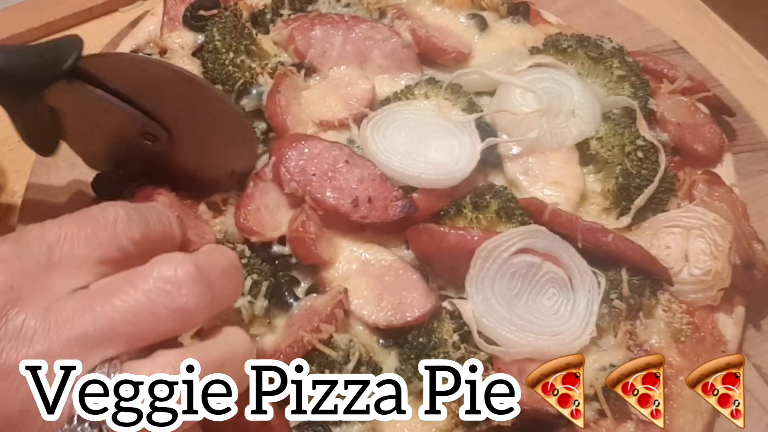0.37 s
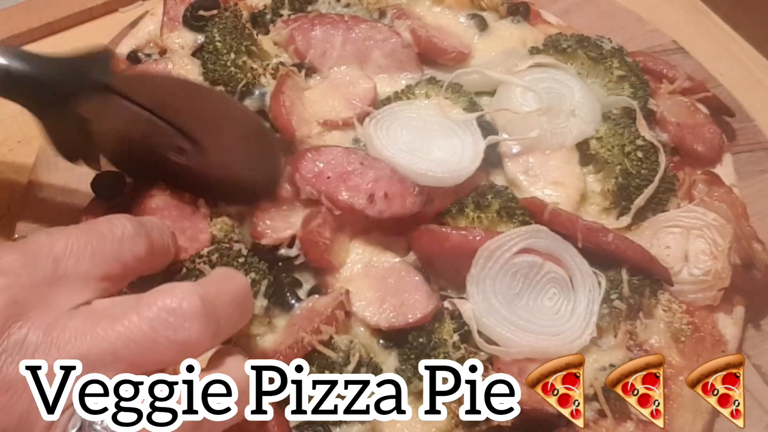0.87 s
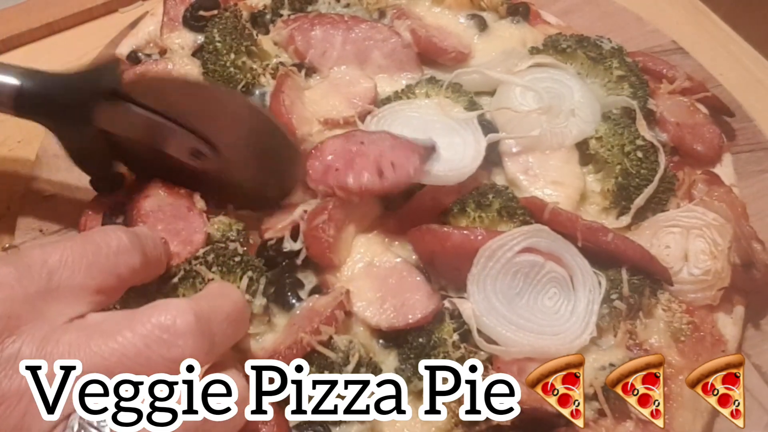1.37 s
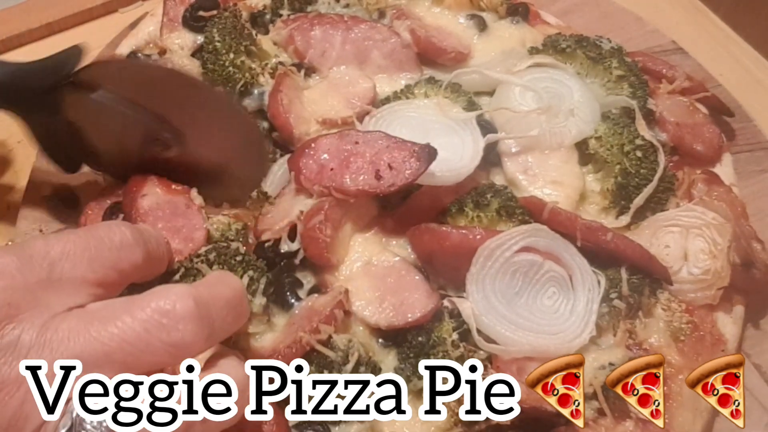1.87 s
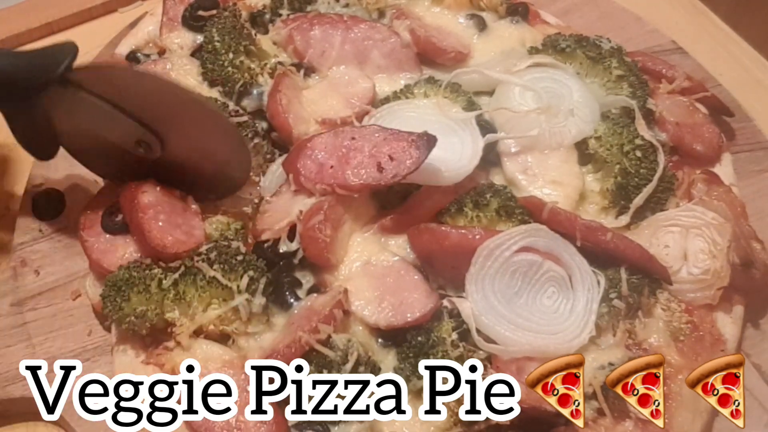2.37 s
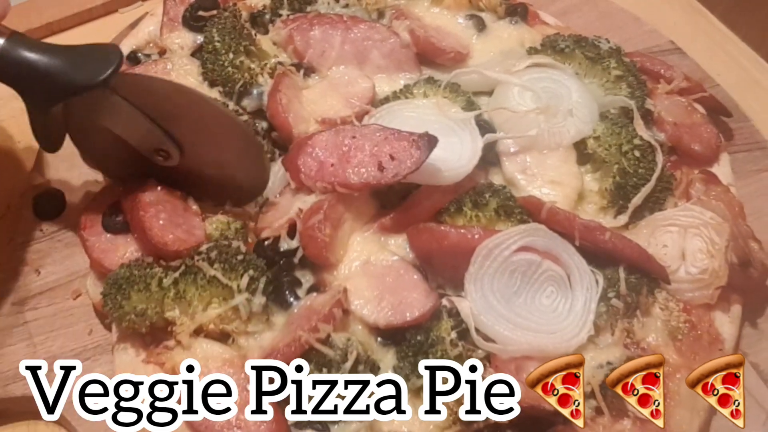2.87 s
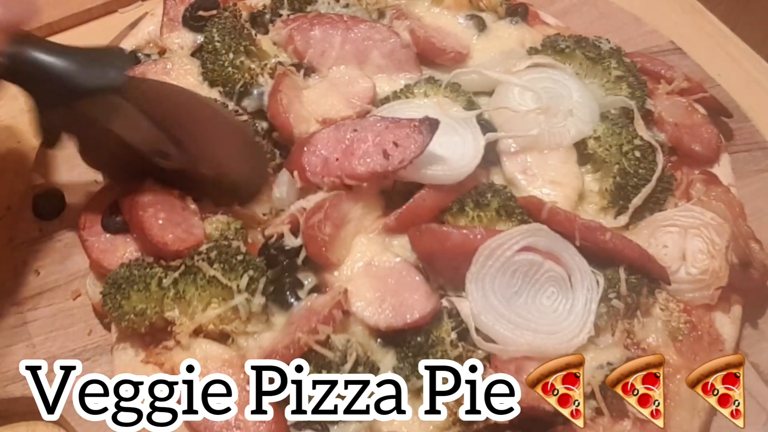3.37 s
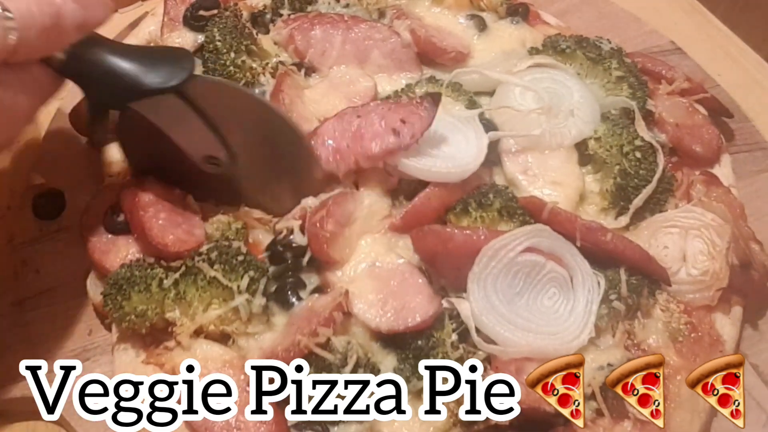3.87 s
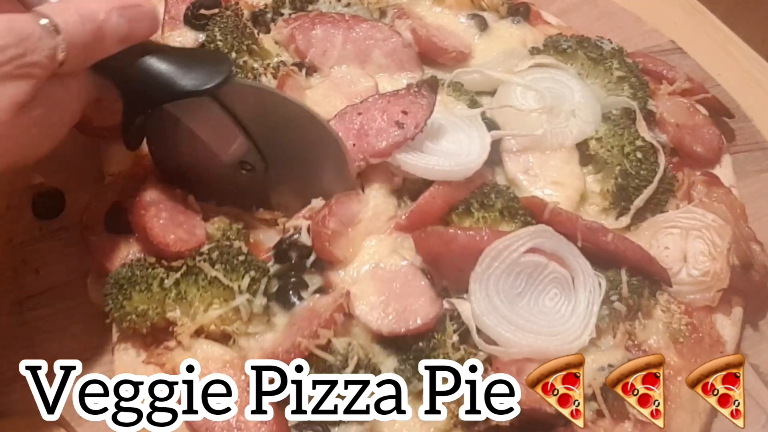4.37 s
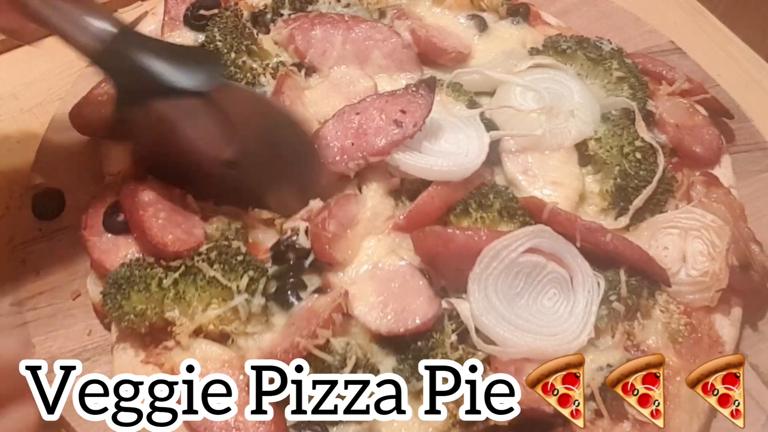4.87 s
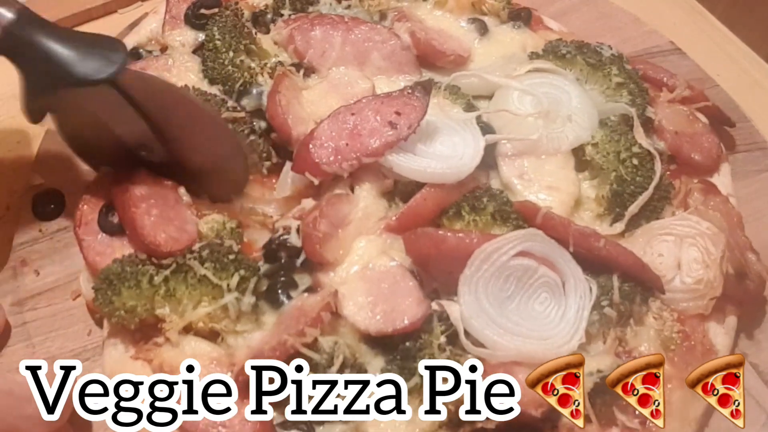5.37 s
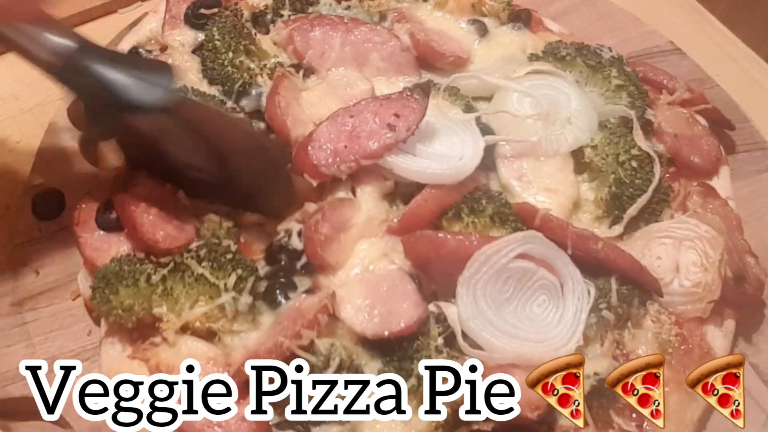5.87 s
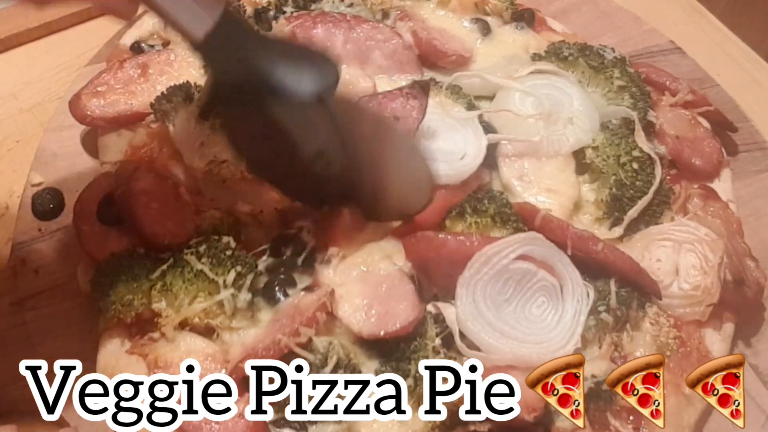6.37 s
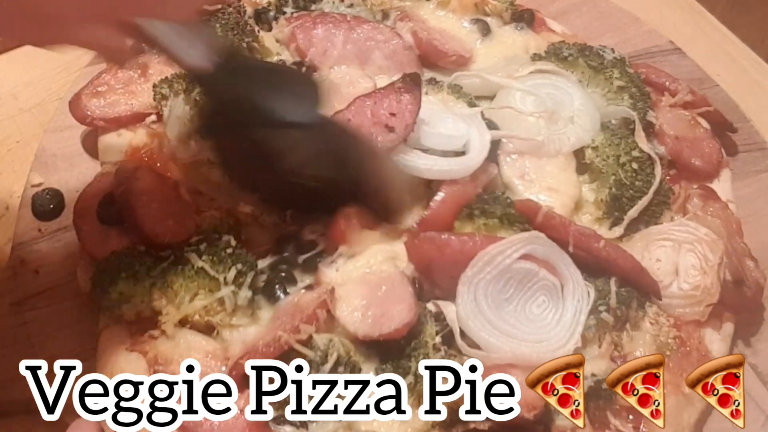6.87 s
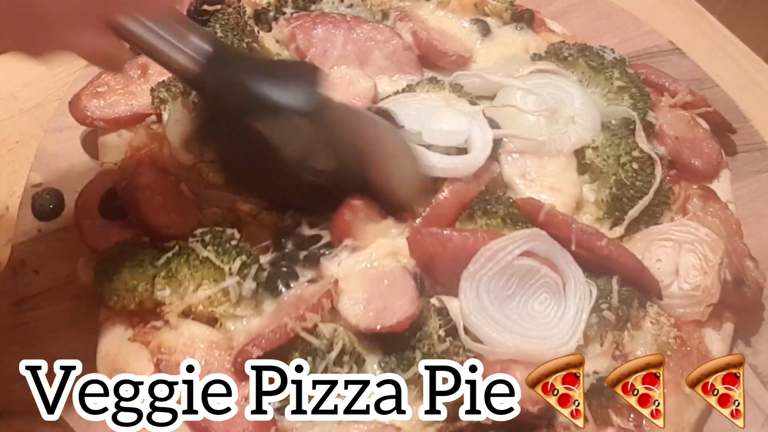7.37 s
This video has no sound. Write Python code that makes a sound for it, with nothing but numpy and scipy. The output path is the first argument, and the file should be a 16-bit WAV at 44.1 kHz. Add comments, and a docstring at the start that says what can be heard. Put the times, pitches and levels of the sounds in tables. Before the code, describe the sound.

In a small hard kitchen, a steel wheel cutter starts with faint crackles and knocks on pizza crust. From two seconds the strokes press harder, crunching crisp crust and grinding a wooden board while a low drone swells. After the hardest run, the lifted wheel clicks and rings briefly around six seconds, then lighter cuts follow. Close stereo microphones.

```python
"""A kitchen, two close microphones: a faint narrow hiss, then a steel wheel cutter rocks lightly in a pizza crust.
From two seconds the strokes bear down, grinding the wooden board in grains and cracking the crisp crust; the hiss
returns once as an appliance drone swells. Knocks and snaps are millisecond bursts that ring the board.
After a last hard run the lifted wheel clicks on its axle from six seconds and rings in steel modes; lighter strokes
follow. The small hard room answers every stroke and blow for a third of a second, over steady air."""
import sys
import numpy as np
from scipy import signal
from scipy.fft import rfft, irfft, next_fast_len
from scipy.io import wavfile
from scipy.ndimage import uniform_filter1d

SR = 44100
rng = np.random.default_rng(int(sys.argv[2]) if len(sys.argv) > 2 else 0)


def transcribe(signal):
    """Save signal, clipped to [-1, 1], as a 16-bit WAV file at the path in sys.argv[1]."""
    frames = np.atleast_2d(signal).T
    limited = np.clip(frames, -1, 1)
    pcm = np.round(limited * 32767).astype(np.int16)
    wavfile.write(sys.argv[1], SR, pcm)


def voltage_ratio(decibels):
    """Convert decibels (scalar or array-like) to amplitude ratios, 20 dB per decade."""
    exponent = np.asarray(decibels, float) / 20
    return 10 ** exponent


N = 330309

# pushes of the wheel: full push t/s, hold t/s, pressure on the board level/dB, crust breaking level/dB,
# crispness of the break level/dB above the breaking (all before the trims in strokes)
STROKE_PUSHES = [(0.0, 0.02, -57, -95, -12), (0.34, 0.07, -72, -90, 14.5), (0.457, 9.4, -78, -79.5, 6),
                 (0.75, 0.036, -52, -60, 5), (0.857, 0.017, -55.5, -65.5, 6), (0.904, 0.029, -70, -63, -4),
                 (1.157, 0.12, -59, -58.5, 4.5), (1.36, 0.32, -63, -71, 5.5), (1.608, 0.026, -57, -57, -4),
                 (1.764, 0.071, -55, -62, 3), (1.919, 0.043, -45, -60.5, 3),
                 (2.082, 0.034, -37.5, -51.5, 2), (2.252, 0.059, -53.5, -56, 1),
                 (2.347, 0.1, -56, -67.5, -7), (2.504, 0.2, -38, -49, 4.5), (2.757, 0.048, -37, -47, 0.5),
                 (2.995, 0.047, -35, -49.5, 4.5), (3.1, 0.1, -39, -49, 3.5), (3.27, 0.036, -47.5, -67, -13),
                 (3.357, 0.11, -40.5, -52, 6.5), (3.537, 0.097, -35.5, -48.5, 4.5),
                 (3.706, 0.028, -41, -51, -1), (3.863, 0.066, -35.5, -49, 2.5),
                 (4.037, 0.073, -44, -54, -1.5), (4.154, 0.044, -42.5, -53, 2),
                 (4.262, 0.015, -61, -62, -5), (4.42, 0.13, -64, -79, 5), (4.742, 0.033, -58.5, -80, 12),
                 (4.94, 0.045, -31, -40.5, 3.5), (5.096, 0.07, -38, -45, 1), (5.282, 0.088, -36, -44, 4),
                 (5.444, 0.029, -32, -45, 2.5), (5.589, 0.029, -32, -45, 3), (5.745, 0.0073, -35, -46, 4.5),
                 (5.883, 0.015, -34.5, -44, 4.5), (6.103, 0.41, -58, -58.5, -23),
                 (6.59, 0.024, -56, -53, -4), (6.756, 0.03, -60, -72.5, 10), (6.872, 0.071, -59, -57, -1),
                 (7.024, 0.013, -53, -61, 3), (7.07, 0.011, -66, -49.5, 4.5),
                 (7.215, 0.034, -44, -48.5, 2.5), (7.333, 0.028, -42, -51.5, 2.5),
                 (7.48, 0.02, -59, -55, -1)]
# where the crust breaks, as the microphones hear it: lag of the right one t/s, pan L-R level/dB
BREAK_SPOTS = [(.00014, 5), (0.000065, -1.5)]


def strokes():
    """Rolling pressure grinds the board; the crust breaks in grains at two spots and stirs the wheel."""
    start, hold, pressure_db, break_db, crispness_db = np.transpose(STROKE_PUSHES)
    pressure = pushes(start, hold, pressure_db, rise_db_per_s=397, fall_db_per_s=252, rest_db=-79)
    coarse, fine = [pushes(start, hold, db, rise_db_per_s=370, fall_db_per_s=272, rest_db=-85.5)
                    for db in (break_db, break_db + crispness_db)]
    out = 0
    for lag_s, pan_db in BREAK_SPOTS:
        grinding = voltage_ratio(-6.0) * pressure * grains(1600, spread_db=3.0, clump_db=2.5)
        grind = board(grinding, patchy_db=4.0)
        breaking = grains(1500, spread_db=4.0, clump_db=2.5)
        crisp = voltage_ratio(-6.5) * fine * breaking
        crumbs = voltage_ratio(-1.77) * coarse * breaking
        ringing = voltage_ratio(8.2) * stirred_wheel(crisp, damping=7.0)
        out = out + placed(grind + crust(crumbs, crisp) + ringing, lag_s, pan_db)
    return out


def pushes(start, hold, level_db, rise_db_per_s, fall_db_per_s, rest_db):
    """Each push builds up to its start, holds and lets go; overlapping pushes add as power. Gain over time."""
    t = np.arange(0, N / SR + .002, .001)
    start, hold = start[:, None], hold[:, None]
    building_db = rise_db_per_s * np.maximum(start - t, 0)
    letting_go_db = fall_db_per_s * np.maximum(t - start - hold, 0)
    gains = voltage_ratio(level_db[:, None] - building_db - letting_go_db)
    power = np.sum(gains ** 2, axis=0) + voltage_ratio(rest_db) ** 2   # the wheel at rest is the floor
    return np.interp(np.arange(N) / SR, t, np.sqrt(power))


def grains(per_s, spread_db, clump_db):
    """Random fractures, a few much larger than the rest, coming in clumps; rms 1."""
    clumps = rms_one(uniform_filter1d(rng.standard_normal(N), size=500))
    born = rng.random(N) < per_s / SR
    sizes = voltage_ratio(spread_db * np.minimum(rng.exponential(1, N), 5) + clump_db * clumps)
    return rms_one(born * sizes * rng.choice([-1, 1], N))


# spectrum of the coarse crumbling: f/Hz, relative level/dB per Hz
CRUMB_SPECTRUM = [(2000, 3.5), (2600, 4.5), (3500, 6), (5000, 6), (6000, 5), (7500, -9), (9000, -23.5)]
# spectrum of the crisp edge of a break: f/Hz, relative level/dB per Hz
CRISP_SPECTRUM = [(6000, 5), (8000, 0), (10000, 3.5), (12400, 9), (14000, 7), (15500, 6.5), (16500, -30)]


def crust(coarse, fine):
    """Breaking crust radiates a coarse crumble and a finer, brighter edge."""
    return shape(coarse, CRUMB_SPECTRUM) + shape(fine, CRISP_SPECTRUM)


# resonances of the wooden board: f/Hz, width f/Hz, relative level/dB
BOARD_MODES = [(110, 22, -5.5), (223, 42.4, -1), (297.4, 53.3, 1), (458.5, 51, 0), (573, 82, -2.5),
               (710, 132, -2.5), (882, 89, 0), (1044, 121, 1), (1278, 130, -1.5), (1475, 254, -3.5),
               (1836, 320, -5.5), (2097, 162, -5.5), (2592, 260, -9), (2920, 430, -11.5)]


def board(x, patchy_db):
    """Broad resonances in parallel, each fed unevenly as the contact moves; normalised by their noise power."""
    out, power = 0, 0
    for k, (hz, width, db) in enumerate(BOARD_MODES):
        fed = x * voltage_ratio(patchy_db * drift(14))
        out = out + (-1) ** k * voltage_ratio(db) * resonance(fed, hz, width)   # neighbours in opposite sign
        power += voltage_ratio(db) ** 2 * np.pi * width / SR
    return out / np.sqrt(power)


# modes of the free steel wheel: f/Hz, relative level/dB, 60 dB decay t/s, family (nodal lines less two)
WHEEL_MODES = [(3490, -3, .2, 0), (5570, -7, .3, 0), (5890, 0, .25, 0), (6010, -6, .2, 0),
               (8930, 3, .15, 0), (7840, 0, .4, 1), (13320, 2, .35, 1), (10100, 3, .1, 2),
               (11700, -8, .1, 2), (12310, 0, .3, 3), (12420, -7, .2, 3), (14120, 5, .13, 4),
               (14380, 1, .1, 4)]


def stirred_wheel(x, damping):
    """Steel modes stirred by the crackle; the dough shortens their decay by the damping factor."""
    out = np.zeros(N)
    for hz, db, t60, _ in WHEEL_MODES:
        width = damping * np.log(1000) / (np.pi * t60)
        out += voltage_ratio(db) * resonance(x * voltage_ratio(5.9 * drift(7.8)), hz, width)
    return out


def tapped_wheel(taps):
    """The free wheel rings, each mode as strong as it moves at the struck spot; the next click stops the ring."""
    hz, db, t60, family = np.transpose(WHEEL_MODES)[:, :, None]
    knee_hz, node_leak = 10000, .06   # a mode struck on its nodal line still sounds a little
    starts = [round(row[0] * SR) for row in taps]
    t, out = np.arange(SR // 3) / SR, np.zeros(N)
    for start, stop, (*_, ring_db, degrees, thin_db) in zip(starts, [*starts[1:], N], taps):
        stopped_db = -1500 * np.maximum(t - (stop - start) / SR, 0)
        moves = np.abs(np.cos(np.radians(degrees) * (family + 2))) + node_leak
        moves = moves * voltage_ratio(thin_db * np.minimum(np.log2(hz / knee_hz), 0))
        modes = moves * voltage_ratio(ring_db + db - 60 * t / t60) * np.sin(2 * np.pi * hz * t)
        out[start:start + len(t)] += voltage_ratio(stopped_db) * modes.sum(axis=0)
    return out


# the wheel knocks through to the board: t/s, blow level/dB, dull thump level/dB above the blow,
# crack of the crust level/dB above the blow (before the trims in jolt and crack)
BOARD_KNOCKS = [(0.3385, -65, 9.5, -16), (0.398, -75, 6, -10), (0.4539, -27.5, -8.5, 4.5),
                (0.7213, -40, -15, -4), (0.771, -38.5, -8, 3), (0.9304, -42.5, -1.5, -2),
                (1.163, -41.5, -10, 0), (1.219, -59, 2, -6), (1.358, -61, 6, -13), (1.6699, -67.5, 16, 10),
                (1.778, -61.5, 15.5, -1), (1.8867, -46, -3.5, -7), (1.924, -50, 4, -14),
                (1.9521, -40.5, -4.5, 0), (2.492, -42, 5, -12), (2.5156, -30.5, -5.5, -12),
                (2.57, -34.5, -1, 2), (2.586, -17.5, -8.5, 4), (2.76, -32.5, -4, -6),
                (3.1139, -17.5, -9.5, 1), (3.3599, -34, -31, -9), (3.4355, -29.5, -7, 3.5),
                (3.6265, -30, -3.5, -16), (3.7704, -31.5, -9.5, -1.5), (4.1252, -44.5, 8, -12),
                (4.359, -24, -9, 3), (4.86, -53, -13, -31), (4.8916, -36, -10, -11), (4.94, -34.5, 0.5, -6),
                (4.972, -32, -21, 5), (5.1246, -27, -27, -5), (5.1931, -23, -7.5, -0.5),
                (5.2747, -36, -20, -2), (5.2997, -31, -15, -18), (5.5802, -38.5, -6, -5),
                (5.5926, -28.5, -28, -3), (5.7285, -37, -11, -1), (5.756, -28, -11, -10),
                (5.8691, -32, -12, -7), (5.891, -29, -6, -18), (6.005, -24.5, -8, 3),
                (6.636, -40.5, -4, -7), (6.7933, -24.5, -6.5, 0), (6.927, -41, -0.5, 2.5),
                (6.9048, -54, 7, 15.5), (7.0134, -37.5, -3.5, -2.5), (7.2462, -36.5, -5.5, -10),
                (7.3514, -37.5, -6.5, 3)]


def knocks():
    """The wheel striking through: a jolt for the board, and a crack whose crisp edge partly follows its level."""
    s, blow_db, thump_db, crack_db = np.transpose(BOARD_KNOCKS)
    crack_db = blow_db + crack_db
    return jolt(s, blow_db + thump_db, blow_db), crack(s, crack_db, -34 + 0.47 * crack_db)


# single snaps of the crust: t/s, crack level/dB, crispness level/dB above the crack (before the same trims)
CRUST_SNAPS = [(0.7357, -39, -6.5), (0.9127, -48, -14), (0.9544, -48.5, 3), (1.0397, -44, -8),
               (1.1498, -34.5, -12), (1.247, -39, -20), (1.4922, -46.5, -5.5), (2.231, -43, -10.5),
               (2.829, -44.5, -0.5), (3.4362, -42.5, 9), (3.7035, -40.5, -4), (4.029, -46.5, 0),
               (4.2953, -38.5, -11.5), (4.5211, -51, -6.5), (4.9925, -33, 3.5), (5.0904, -39, 0),
               (5.1545, -42, -1.5), (6.3847, -39.5, -30), (7.1093, -38.5, -18), (7.2209, -39, -11)]


def snaps():
    """The crust snapping by itself: a crack, with a small share of it jolting the board."""
    s, crack_db, crispness_db = np.transpose(CRUST_SNAPS)
    into_board_db = crack_db - 13
    return jolt(s, into_board_db - 3.5, into_board_db), crack(s, crack_db, crack_db + crispness_db)


# clicks of the lifted wheel on its axle: t/s, click level/dB (before the same trims), ring level/dB,
# place round the rim/degrees, ring lost below the knee level/dB per octave
AXLE_CLICKS = [(6.0140, -39, -51, 33.5, 2), (6.0320, -22.5, -38, 90, 18), (6.1634, -29, -42, 70.5, 0),
               (6.2636, -29, -40, 28, 0), (6.4109, -31, -56, 28, 2), (6.5585, -37, -61, 84, 3)]


def axle_clicks():
    """The lifted wheel clicking: its jolt goes through hand and counter, and the steel rings."""
    s, click_db = np.transpose(AXLE_CLICKS)[:2]
    thud_db = click_db - 23.5
    return jolt(s, thud_db, thud_db + 3.0), crack(s, click_db, click_db - 4) + tapped_wheel(AXLE_CLICKS)


def blows():
    """Knocks, snaps and clicks share the board; their treble leans towards the left microphone."""
    knock_push, knock_treble = knocks()
    snap_push, snap_treble = snaps()
    click_push, click_treble = axle_clicks()
    thuds = board(knock_push + snap_push + click_push, patchy_db=1.5)
    snap_lag_s, click_lag_s = 0.00011, .000163
    return (placed(thuds, snap_lag_s, 0) + placed(knock_treble + snap_treble, snap_lag_s, 5.5)
            + placed(click_treble, click_lag_s, 9))


def crack(s, crack_db, crisp_db):
    """The treble of a sudden break or click: a coarse burst and a shorter crisp one."""
    return crust(bursts(s, crack_db + 1.2, decay_s=0.0013), bursts(s, crisp_db + 12.5, decay_s=0.00085))


def jolt(s, thump_db, blow_db):
    """A push into the board: a dull part below 655 Hz and a shorter hard part above."""
    dull, hard = [signal.butter(2, 655, kind, fs=SR, output="sos") for kind in ("low", "high")]
    thump = signal.sosfilt(dull, bursts(s, thump_db + 13.5, decay_s=0.004))
    return thump + signal.sosfilt(hard, bursts(s, blow_db + 12.0, decay_s=0.001))


# all-passes that smear the front of a burst over a millisecond or two: lag t/s
FRONT_LAGS = [.00016, .00029, .00052]


def bursts(s, db, decay_s):
    """A front smeared by short all-passes, with noise that dies within milliseconds."""
    sharp_share, spread = 0.7, .5   # part that comes as one front with an even spectrum; all-pass coefficient
    hits = np.bincount(np.round(s * SR).astype(int), voltage_ratio(db), N) + 1e-18
    envelope = signal.lfilter([1], [1, -np.exp(-1 / (decay_s * SR))], hits)
    noise = envelope * rng.choice([-1, 1], N)
    front = hits
    for lag_s in FRONT_LAGS:
        a = np.r_[1, np.zeros(round(lag_s * SR) - 1), -spread]
        front = signal.lfilter(a[::-1], a, front)
    return np.sqrt(1 - sharp_share) * noise + np.sqrt(sharp_share * decay_s * SR / 2) * front


def kitchen(x):
    """The small hard room: dense reflections dying exponentially, starting with the first echo."""
    t60_s, first_echo_s, room_db = .32, 0.0021, 2.5
    t = np.arange(SR // 2) / SR
    tail = two_ears(rng.standard_normal((2, len(t)))) * voltage_ratio(-60 * t / t60_s) * (t > first_echo_s)
    tail = tail / np.sqrt(np.sum(tail ** 2) / 2)
    return voltage_ratio(room_db) * signal.fftconvolve(x[None], tail)[:, :N]


# swell of the appliance drone: t/s, level/dB (before the offsets of lines and rumble)
DRONE_SWELL = [(0.0, -82), (0.81, -70), (1.19, -65), (2.54, -51.5), (3.77, -55), (4.71, -59), (5.36, -53),
               (7.49, -54.5)]
# the two lines, one entry each: f/Hz; width of the wavering part f/Hz; offset from the swell level/dB
LINE_HZ = [50, 70.6]
LINE_WIDTH_HZ = [7.2, 5]
LINE_DB = [-5, 2]
# spectrum of the rumble: f/Hz, relative level/dB per Hz
RUMBLE_SPECTRUM = [(40, -12), (90, 8.5), (200, -5), (400, -7.5), (900, -19.5)]


def drone():
    """Two low lines that waver (a steady tone plus noise in a narrow resonance) over a rumble."""
    t = np.arange(N) / SR
    swell_db = np.interp(t, *np.transpose(DRONE_SWELL))
    rumble = shape(two_ears(rng.standard_normal((2, N))), RUMBLE_SPECTRUM)
    out = voltage_ratio(-33 + 0.41 * swell_db) * rumble   # the rumble follows the swell only in part
    for db, hz, width in zip(LINE_DB, LINE_HZ, LINE_WIDTH_HZ):
        noise = rng.standard_normal(N + SR)   # the first second lets the resonance settle
        waver = rms_one(resonance(resonance(noise, hz, width), hz, width)[SR:])
        out = out + voltage_ratio(swell_db + db) * (0.47 * waver + 0.95 * np.sin(2 * np.pi * hz * t))
    return out


# faint narrow hisses, sagging in pitch: full level t/s, length t/s, f/Hz at that time, carrier level/dB
HISS_PASSES = [(0.0, 0.36, 1970, -69), (2.239, 0.26, 2145, -58)]


def narrow_hiss():
    """A band of noise carried on a falling tone."""
    width_hz, sag_hz_per_s, fade_s = 330, 800, 0.096
    t, out = np.arange(N) / SR, 0
    low = signal.butter(2, width_hz / 2, fs=SR, output="sos")
    band = rms_one(signal.sosfilt(low, rng.standard_normal((2, N))))
    for start, length, hz, db in HISS_PASSES:
        since = t - start
        fade = np.clip(np.minimum(since + fade_s, length - since) / fade_s, 0, 1)
        phase = 2 * np.pi * (hz - sag_hz_per_s * since / 2) * since
        out = out + voltage_ratio(db) * fade * band * np.sin(phase)
    return out


# spectrum of the steady background: f/Hz, relative level/dB per Hz
AIR_SPECTRUM = [(24, -41), (40, 4.5), (177, 1), (823, -22), (1200, -49), (3830, -49), (5870, -26),
                (8360, -51), (14200, -24), (16500, -38)]


def room_air():
    """Steady background of the kitchen and the microphones, as shaped noise."""
    return voltage_ratio(-61) * shape(two_ears(rng.standard_normal((2, N))), AIR_SPECTRUM)


def two_ears(white):
    """Two microphones from a mid and a side noise: alike below 583 Hz, unrelated in the treble."""
    side = signal.sosfilt(signal.butter(1, 583, "high", fs=SR, output="sos"), white[1])
    return (white[0] + side * [[1], [-1]]) / np.sqrt(2)


def placed(x, lag_s, pan_db):
    """Left and right microphone: the right one hears it a little later; pan is L-R in dB."""
    delay = np.exp(-2j * np.pi * np.fft.rfftfreq(N, 1 / SR) * lag_s)
    late = irfft(rfft(x) * delay, N)
    return np.stack([x * voltage_ratio(pan_db / 2), late * voltage_ratio(-pan_db / 2)])


def rms_one(x):
    """Scales to an rms of 1."""
    return x / np.sqrt(np.mean(x ** 2) + 1e-20)


def drift(per_s):
    """Slow chance, spread 1: random knots joined by straight lines."""
    knots = rng.standard_normal(int(N / SR * per_s) + 2)
    return np.interp(np.arange(N) / SR * per_s, np.arange(len(knots)), knots)


def resonance(x, hz, width_hz):
    """A two-pole resonance with zeros at both ends of the spectrum; peak gain near 1."""
    r = np.exp(-np.pi * width_hz / SR)
    b = np.array([1, 0, -1]) * (1 - r * r) / 2
    return signal.lfilter(b, [1, -2 * r * np.cos(2 * np.pi * hz / SR), r * r], x + 1e-18)


def shape(x, points):
    """Causal filter with a (Hz, dB) spectrum, falling 24 dB an octave outside; white noise keeps its power."""
    size = 2 * next_fast_len(N // 2 + 4096)
    hz, db = np.transpose(points)
    octaves = np.log2(np.fft.rfftfreq(size, 1 / SR) + 1)
    outside = np.maximum(np.log2(hz[0]) - octaves, 0) + np.maximum(octaves - np.log2(hz[-1]), 0)
    gain = rms_one(voltage_ratio(np.interp(octaves, np.log2(hz), db) - 24 * outside))
    cepstrum = irfft(np.log(gain), size)
    cepstrum[1:size // 2] *= 2   # folding gives minimum phase
    cepstrum[size // 2 + 1:] = 0
    return irfft(rfft(x, size) * np.exp(rfft(cepstrum)), size)[..., :N]


def scene():
    """Cutter and blows close by, then the room's answer, the drone, the air and the hiss."""
    rolling, struck = strokes(), blows()
    # blows travel through board and counter into the room; the dough muffles the rolling
    into_room = (struck + voltage_ratio(-9.0) * rolling)[1]
    return rolling + struck + kitchen(into_room) + drone() + room_air() + narrow_hiss()


def low_pass(x):
    """Removes everything above the highest recorded frequency."""
    return signal.sosfilt(signal.butter(12, 16970, fs=SR, output="sos"), x)


def record(dry):
    """The top of the treble drops steeply, by 32 dB just above 15850 Hz."""
    top_hz, top_db = 15850, -32.0
    heard = shape(dry, [(1, 0), (top_hz, 0), (top_hz + 150, top_db), (SR / 2, top_db)])
    return low_pass(heard)


dry = scene()
out = record(dry)
transcribe(out)
```